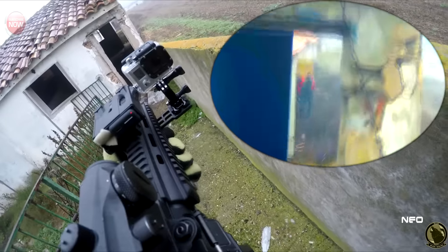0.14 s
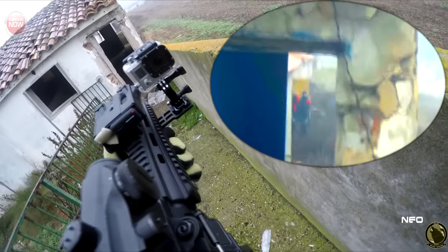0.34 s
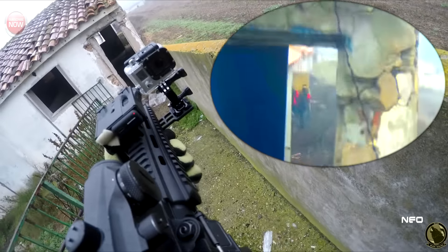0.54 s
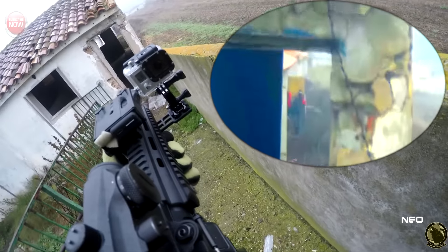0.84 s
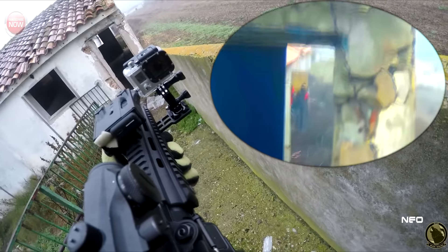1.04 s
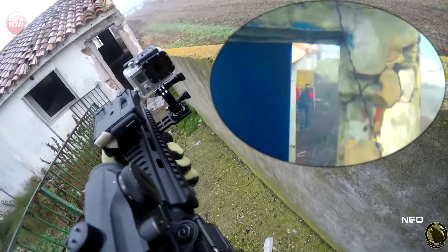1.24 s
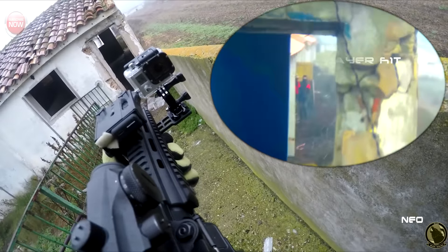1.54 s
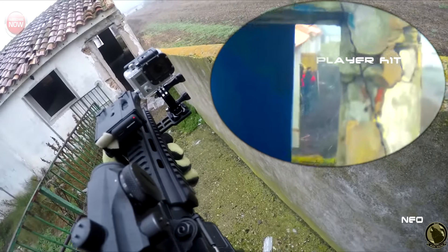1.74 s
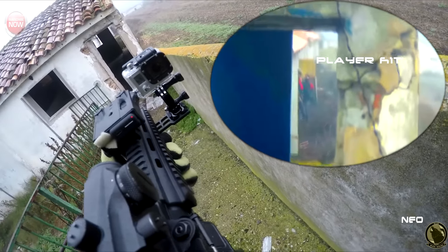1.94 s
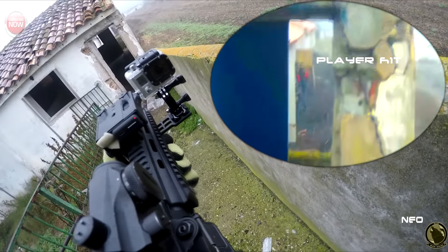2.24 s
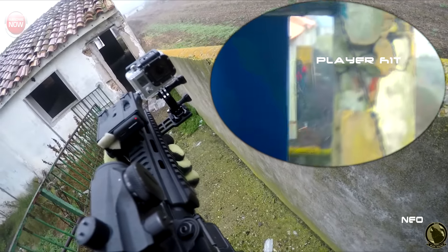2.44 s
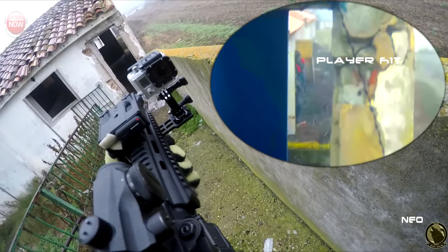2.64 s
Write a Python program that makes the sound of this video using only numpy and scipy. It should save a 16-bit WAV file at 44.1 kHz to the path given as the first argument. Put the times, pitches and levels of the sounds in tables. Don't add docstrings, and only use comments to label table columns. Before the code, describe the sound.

Close electric air rifle fires quick dry clacks with short motor whirs, pausing briefly midway, outdoors.

```python
import sys
import numpy as np
from scipy import signal
from scipy.io import wavfile
from scipy.ndimage import uniform_filter1d

SR = 44100
rng = np.random.default_rng(int(sys.argv[2]) if len(sys.argv) > 2 else 0)


def to_wav(sig):
    pcm = np.clip(np.atleast_2d(sig), -1, 1) * 32767
    pcm = np.round(pcm).astype(np.int16)
    wavfile.write(sys.argv[1], SR, pcm.T)


def gain_from_db(level_db):
    decades = np.asarray(level_db, float) / 20
    return 10 ** decades


N = 123479
T = np.arange(N) / SR


def noise():
    return rng.standard_normal(N)


def evened(x):
    return x / np.sqrt(np.mean(x ** 2) + 1e-20)


def drift(size):
    return evened(uniform_filter1d(noise(), size))


def grit(db, size):
    return evened(noise() * gain_from_db(db * drift(size)))


def colour(x, points):
    hz = abs(np.fft.fftfreq(4096, 1 / SR))
    f, db = np.transpose(points)
    curve = np.interp(np.log(hz + 1), np.log(f), db) - 50 * (hz > 16400)
    log_gain = np.log(gain_from_db(curve))
    taps = np.fft.ifft(np.exp(np.conj(signal.hilbert(log_gain)))).real[:2048]
    return signal.oaconvolve(x, taps / np.linalg.norm(taps))[:N]


def sine(hz, t):
    return np.sin(2 * np.pi * hz * t)


def resonate(x, hz, width_hz):
    turn = np.exp(2j * np.pi * hz * T)
    r = np.exp(-np.pi * width_hz / SR)
    return 2 * (turn * signal.lfilter([1 - r], [1, -r], x / turn)).real


def blow(at, db, t60, rise_s=0.000085):
    t = np.maximum(T - at, 0)
    return np.minimum(t / rise_s, 1) * gain_from_db(db - np.minimum(60 * t / t60, 200))


def bump(at, spread_s):
    return np.exp(-((T - at) / spread_s) ** 2)


# air puff in seconds, motor start in seconds,
# spring release in seconds, slam in seconds after the puff, slam level in dB.
SHOT_TIMES = [(.3118, .2447, .278, .0100, -9), (.5545, .478, .524, .0113, -10),
              (.7077, .640, .677, .0113, -10), (.8853, .819, .855, .0112, -10),
              (1.0496, .977, 1.019, .0113, -10), (1.213, 1.141, 1.182, .0115, -10),
              (1.3706, 1.298, 1.340, .0113, -10), (1.5442, 1.476, 1.514, .0117, -9),
              (1.8668, 1.787, 1.832, .0090, -10), (2.0324, 1.969, 2.005, .0102, -10),
              (2.2281, 2.153, 2.197, .0111, -10), (2.4265, 2.352, 2.396, .0113, -10),
              (2.6113, 2.538, 2.581, .0115, -10)]
# air puff in dB, gear load in dB,
# spring scrape in dB, motor brake in dB, long ring in dB.
SHOT_EFFORT = [(-7.5, -1, 2.5, -11, -27), (-11, -2.5, -2, 0, 5.5), (-11.5, -2, 1, 5.5, -1),
               (-12, -1.5, 0, 5, -1), (-13, -2, -0.5, 9, -6), (-13.5, -2.5, 0.5, -3, -7),
               (-13.5, -1.5, -1, 3, 2), (-14, -2, -2, 4, -11), (-11, -1.5, 3, -26, 2),
               (-11, 0, 1.5, 2, -15), (-11.5, -1.5, -0.5, 4, -1), (-11.5, -1, 0.5, 2.5, -9),
               (-12, -1, 1.5, 4, -3)]
# pitch in Hz, level in dB.
WHISTLE_TONES = [(3540, -16), (2680, -21), (4150, -27)]


def air():
    out = np.zeros(N)
    jet = colour(grit(3, size=12), CLICK_COLOUR)
    whistle_s, edge_s = 0.0045, 0.0006
    for k, (shot, row) in enumerate(zip(SHOT_TIMES, SHOT_EFFORT)):
        puff, puff_db, first = shot[0], row[0], k == 0
        t = T - puff
        swell = np.exp(-(t / np.where(t < 0, 0.027, 0.0079)) ** 2)
        swell *= np.clip((t + 0.00445) / 0.00086, 0, 1)
        out += gain_from_db(puff_db) * swell * np.cos(2 * np.pi * 110.3 * t)
        shudder = np.cos(2 * np.pi * 99.2 * t) + 0.89 * np.cos(2 * np.pi * 230 * t)
        out += blow(puff + 0.035, puff_db - 27, 0.21, 0.0033) * shudder

        t = t + 0.0019 - 0.0048 * first
        gate = np.clip(t / edge_s, 0, 1) * np.clip((whistle_s - t) / edge_s, 0, 1)
        bend = [1 + 0.025 * np.sin(7 * k + hz) for hz, _ in WHISTLE_TONES]
        whistle = sum(gain_from_db(db) * sine(hz * b, t) for (hz, db), b in zip(WHISTLE_TONES, bend))
        out -= gate * (1 + first * bump(puff + 0.0051, 0.0016)) * whistle
        snap = np.maximum(t - 0.0039, 0)
        out -= gain_from_db(-11) * np.exp(-snap / 0.0008) * sine(3000, snap) * (not first)
        out += gain_from_db(-26.5 + 3.6 * first) * gate * jet
    return out


# frequency in Hz, level in dB.
KNOCK_COLOUR = [(120, -9), (250, 0.5), (700, 11), (1500, 5), (3300, 4), (6000, -7.5), (13000, -13.5),
                (16000, -43)]
# time in seconds after the puff, level in dB, T60 in seconds.
KNOCK_TIMES = [(-.0097, -11, .009), (-.0054, -16, .007), (.015, -9, .009), (.019, -17, .02),
               (.0335, -16, .011)]
# frequency in Hz, level in dB.
SLAM_COLOUR = [(120, -37), (250, -13.5), (749, -9), (2250, -11.5), (3370, -10.5), (7970, -8), (11100, -17),
               (13100, -10), (16000, -22.5)]
# time in seconds after the slam, level in dB, T60 in seconds.
SLAM_TIMES = [(-.0004, 6, 0.013), (.0035, -3, 0.012), (.004, -19, 0.05)]
# pitch in Hz, level in dB, T60 in seconds.
THUD_MODES = [(278.6, -4, 0.048), (329, -11.5, 0.074), (378, -13.5, 0.062), (750, 5, 0.0084),
              (1565, -2, 0.0069), (652, 0.5, 0.018), (744.4, -7, 0.064), (850.6, -11, 0.08),
              (973, -4, 0.038), (3138, 2, 0.018), (3490, -7.5, 0.036)]
# pitch in Hz, level in dB, T60 in seconds.
RING_MODES = [(4860, -24, .12), (7700, -33, .16), (9540, -22, .045), (11670, -13, .05), (12310, -21, .065),
              (13100, -12, .05), (14180, -16, .055)]
# pitch in Hz, level in dB, T60 in seconds.
LONG_RING_MODE = (9760, -38.5, .35)


def piston():
    knocks, cracks, tones = np.zeros((3, N))
    lucks = rng.standard_normal((len(SHOT_TIMES), 20))
    long_hz, long_db, long_t60 = LONG_RING_MODE
    for (puff, _, _, late, slam_db), row, luck in zip(SHOT_TIMES, SHOT_EFFORT, lucks):
        puff_db, _, _, brake_db, ring_db = row
        hit = puff + late
        for s, db, t60 in KNOCK_TIMES:
            missing_db = 20 * (s > 0.03 and brake_db < -10)
            knocks += blow(puff + s, db + 2 * luck[round(s * 200)] - missing_db, t60)
        knocks += blow(hit, slam_db - 13.5, 0.083, 0.0042)
        for s, db, t60 in SLAM_TIMES:
            cracks += blow(hit + s, slam_db + db, t60, 0.0006)
        modes = THUD_MODES + RING_MODES + [(long_hz, long_db + ring_db, long_t60)]
        for k, (hz, db, t60) in enumerate(modes):
            pitch = hz * (1 + (0.015 if hz < 9000 else 0.0015) * luck[k])
            db = db + (puff_db + 11) * (hz < 400)
            tones -= blow(hit, slam_db + db + 2 * luck[-k - 1], t60, 0.0015) * sine(pitch, T - hit)
    knocks = colour(knocks * grit(3.5, size=12), KNOCK_COLOUR)
    cracks = colour(cracks * grit(2.37, size=10), SLAM_COLOUR)
    return tones, knocks + cracks


# frequency in Hz, level in dB.
SCRAPE_COLOUR = [(120, -8.5), (200, -13), (683, -4), (2420, -1), (10100, -3), (11100, -9.5), (12800, 0),
                 (14900, -6), (16000, -42)]


def spring():
    shape = np.zeros(N)
    top_s, t60 = 0.011, 0.045
    for (_, _, free, _, _), row in zip(SHOT_TIMES, SHOT_EFFORT):
        t = T - free
        db = np.where(t < top_s, -4 * (1 - t / top_s), -60 * (t - top_s) / t60)
        shape += (t > 0) * gain_from_db(-18 + row[2] + np.clip(db, -200, 0))
    return colour(shape * grit(3, size=30), SCRAPE_COLOUR)


# frequency in Hz, level in dB.
GEAR_COLOUR = [(120, -92.5), (200, -15.5), (647, -1.5), (1210, -3), (1650, -6), (2420, -11), (3190, -7),
               (7830, -18), (16000, -67)]
# time in seconds after the release, level in dB.
GEAR_LOAD = [(-.045, -38), (-.02, -27.5), (0, -24.5), (.014, -25.5), (.026, -20.5), (.05, -30.5),
             (.07, -37), (.095, -47.5), (0.124, -60)]
# multiple of the mesh rate, level in dB.
MESH_TONES = [(1, -26), (2, -27), (3, -33)]


def motor():
    hum, load, whine = np.zeros((3, N))
    hum_hz, hum_width_hz, mesh_hz, mesh_top_hz = 704, 33.6, 1026, 1770
    wobble = np.cumsum(drift(400)) * 12 / SR
    load_s, load_curve = np.transpose(GEAR_LOAD)
    for (puff, start, free, _, _), (_, load_db, _, brake_db, _) in zip(SHOT_TIMES, SHOT_EFFORT):
        hum += blow(start, -28.5 + load_db, 0.24, 0.002)
        hum += gain_from_db(-25 + load_db) * bump(free + 0.0067, 0.003)
        hum += gain_from_db(-32.5 + brake_db) * bump(puff + 0.0537, 0.0063)

        strain_db = np.interp(T - free, load_s, load_curve, right=-99)
        load += gain_from_db(load_db + strain_db) * np.clip((T - start) / 0.0021, 0, 1)

        lag = np.exp(-np.maximum(T - start, 0) / 0.026)
        top_hz = mesh_top_hz * (1 + 0.024 * rng.standard_normal())
        turns = np.cumsum(top_hz - (mesh_top_hz - mesh_hz) * lag) / SR + wobble
        swell = bump(free - 0.0058, 0.0065) + gain_from_db(-1) * bump(free + 0.015, 0.0099)
        whine += gain_from_db(load_db) * swell * sum(gain_from_db(d) * sine(k, turns) for k, d in MESH_TONES)
    housing = resonate(resonate(noise(), hum_hz, hum_width_hz), hum_hz, 3 * hum_width_hz)
    hum_tone = 0.9 * sine(1, hum_hz * T + 3 * wobble)
    hum *= evened(evened(housing) + hum_tone)
    whine *= 1 + 0.5 * drift(70)
    return hum + whine, colour(load * grit(2.5, size=20), GEAR_COLOUR)


# time in seconds, peak level in dB, dullness in dB.
CLICK_TIMES = [(0.2293, -32, -12), (0.2325, -44, -12), (0.237, -47, -9), (0.253, -39, -20),
               (0.3002, -3, 14), (0.3286, 0.5, -4), (0.349, -22, -8), (0.384, -43, -12), (0.448, -46, 0),
               (0.6645, -30, -10), (0.8365, -37, -12), (1.0014, -22, -12), (1.16, -24, -15),
               (1.3158, -15, -13.5), (1.496, -24, -5), (1.8088, -18, -8), (1.8392, -6, -13),
               (1.8573, -20, 5), (1.8831, -1.5, 0), (2.1641, -38, -13), (2.537, -30, 5), (2.768, -40, -7),
               (2.779, -42, -10), (0.2448, -37.5, 28), (0.2636, -33, -4), (0.2714, -20, -2),
               (0.411, -30, 19.5), (0.472, -45, -15), (0.4949, -15.5, -19), (0.623, -20, -14),
               (0.7829, -14.5, -28), (0.9566, -16, -10), (0.9763, -23, -4), (1.1243, -14.5, -23),
               (1.289, -18, -20), (1.4463, -25, -7), (1.614, -17.5, -15), (1.6376, -32, 8.5),
               (1.736, -27, -2), (1.7744, -55, -12), (1.7888, -35.5, 24.5), (1.9688, -2, -2),
               (2.0845, -18, -5), (2.1466, -31, 14.5), (2.313, -22, 6), (2.3187, -26, 12),
               (2.3521, -30, 12), (2.495, -24, -1), (2.5193, -27, 18), (2.6812, -16, -21),
               (2.7057, -28.5, 15.5), (2.7954, -36, -18)]
# frequency in Hz, level in dB.
CLICK_COLOUR = [(120, -62), (200, -3.5), (836, 2), (2560, -7), (3430, -0.5), (4270, -7.5), (8000, -10.5),
                (13600, -25.5), (16000, -33)]


def trigger():
    bright = colour(grit(7.1, size=15), CLICK_COLOUR)
    dull = signal.lfilter([0.3], [1, -0.7], bright)
    note_hz = np.repeat(rng.uniform(1200, 7500, size=N // 600 + 1), repeats=600)[:N]
    turn = np.exp(2j * np.pi * np.cumsum(note_hz) / SR)
    note = evened((turn * signal.lfilter([1], [1, -0.94], bright / turn)).real)
    bright = 0.75 * bright + 0.4 * note
    out, t60 = np.zeros(N), 0.016
    for s, db, dull_db in CLICK_TIMES:
        hit = blow(s, db - 6, t60, 0.0002)
        rebound = blow(s + 0.009, db - 24, t60)
        out += (hit + rebound) * (bright + gain_from_db(dull_db - 3.0) * dull)
    return out


# pitch in Hz, width in Hz, level in dB over the direct sound.
BODY_MODES = [(707, 110, 0.5), (1700, 130, -37), (2940, 217, -2.5), (3390, 510, -9), (4890, 97, 5),
              (5500, 670, -2.5), (7860, 290, -2.5), (10070, 560, 2.5), (11200, 130, 8.5), (13500, 100, 3)]


def body(rattle):
    ringing = sum(gain_from_db(db) * resonate(rattle, hz, width) for hz, width, db in BODY_MODES)
    return gain_from_db(-6.0) * (rattle + ringing)


def yard(x):
    t = T[:SR // 2]
    low_pass = signal.butter(2, 6360, fs=SR, output="sos")
    dull = signal.sosfilt(low_pass, rng.standard_normal(len(t)))
    tail = dull * gain_from_db(-60 * t / 0.24) * (t > 0.008)
    return gain_from_db(-21.5) * signal.oaconvolve(x, tail / np.linalg.norm(tail))[:N]


# frequency in Hz, level in dB.
WASH_COLOUR = [(12, -31), (20, -9), (69, -6.5), (129, -11.5), (270, -12.5), (397, -30), (1650, -26.5),
               (1840, -27.5), (14000, -56.5)]
# time in seconds, level in dB.
GUST_LEVELS = [(0, -58), (.06, -45.5), (.15, -47), (.22, -64), (.4, -48), (1.7, -63.5), (2.6, -52),
               (2.72, -42), (2.77, -54)]


def field():
    s, db = np.transpose(GUST_LEVELS)
    band = signal.butter(2, [30, 200], "band", fs=SR, output="sos")
    wind = evened(signal.sosfilt(band, grit(3.5, size=700)))
    return gain_from_db(-51) * colour(noise(), WASH_COLOUR) + gain_from_db(np.interp(T, s, db)) * wind


def scene():
    hum, gears = motor()
    tones, cracks = piston()
    rattle = gears + cracks + spring() + trigger()
    rifle = body(rattle) + hum + tones
    return (rifle + yard(rifle) + air() + field())[None]


def band_limit(x):
    return signal.sosfilt(signal.butter(12, 16460, fs=SR, output="sos"), x)


def record(dry):
    edge = signal.butter(14, 15500, fs=SR, output="sos")
    limited = 0.82 * np.tanh(dry / 0.75)
    mix = signal.sosfiltfilt(edge, limited)
    return band_limit(mix)


dry = scene()
out = record(dry)
to_wav(out)
```